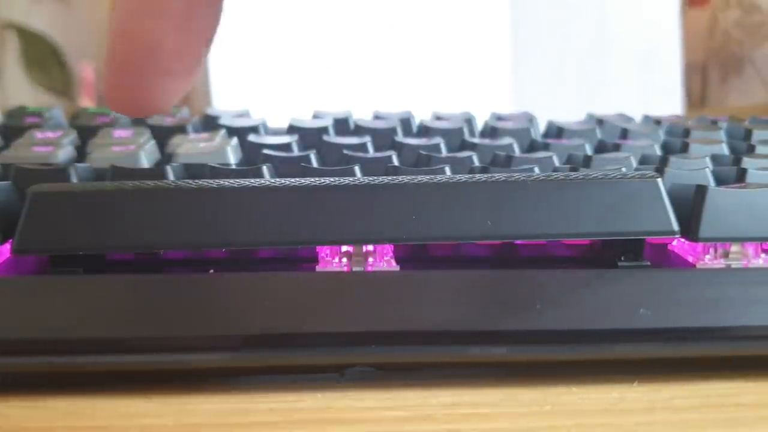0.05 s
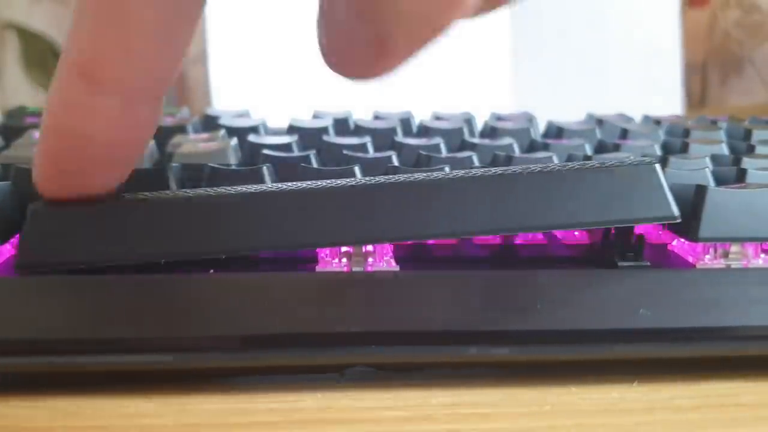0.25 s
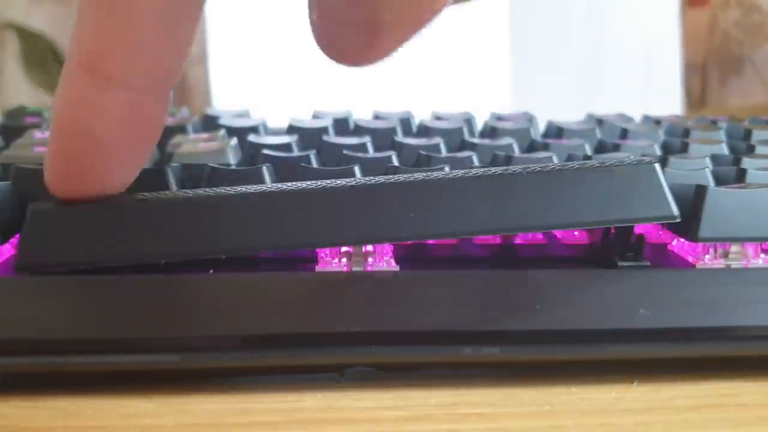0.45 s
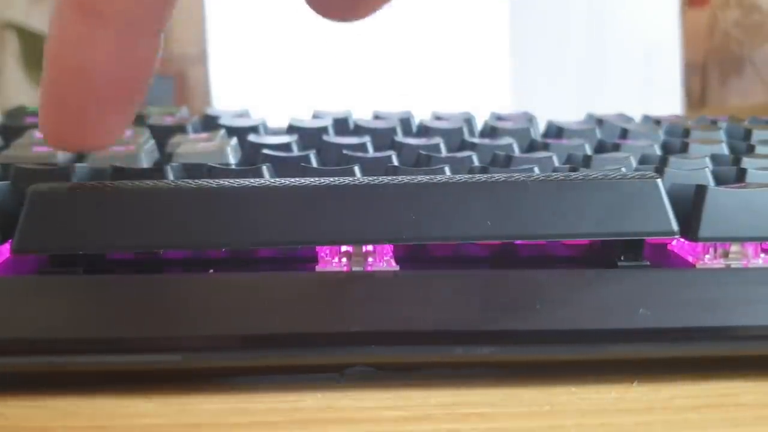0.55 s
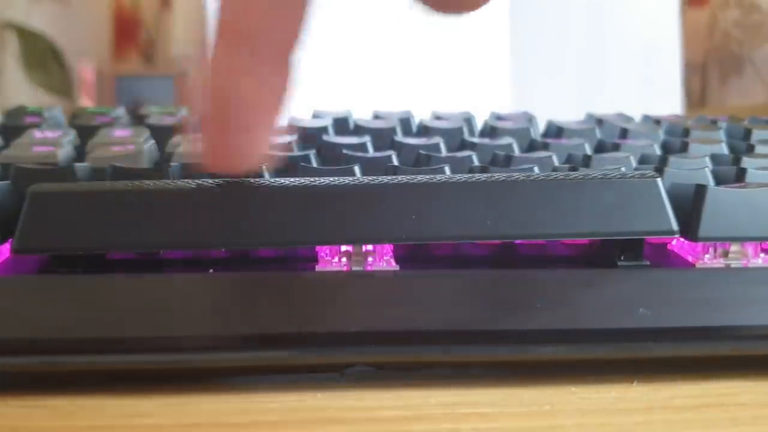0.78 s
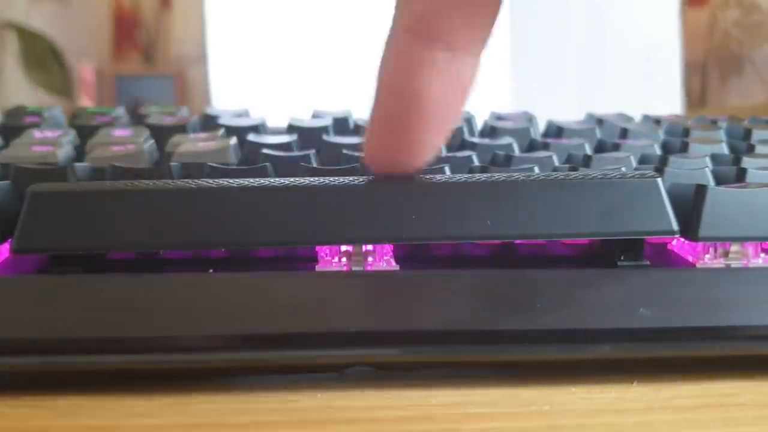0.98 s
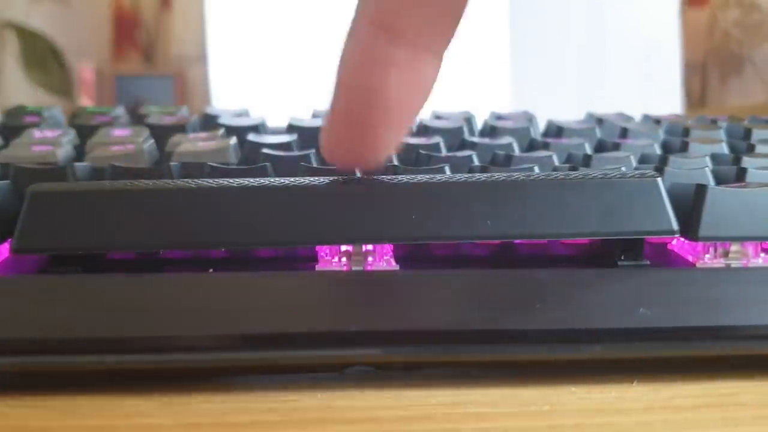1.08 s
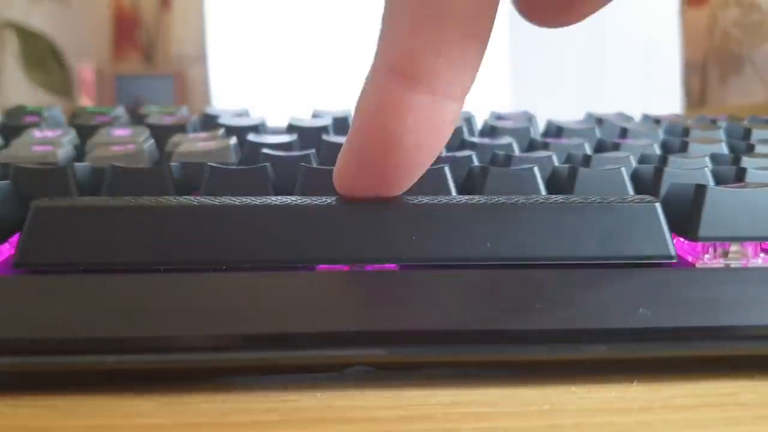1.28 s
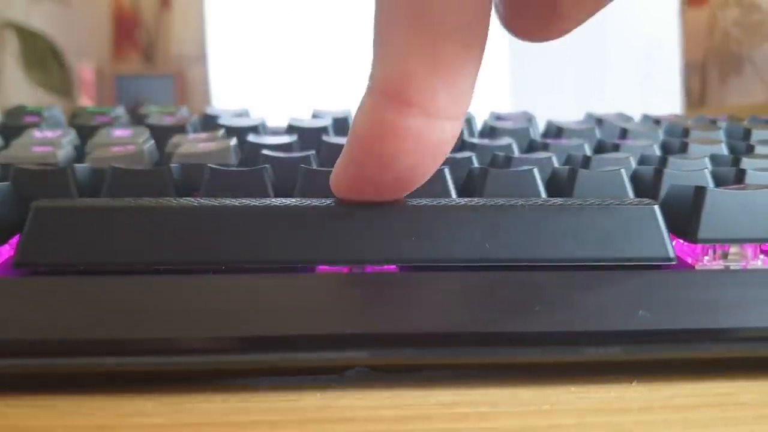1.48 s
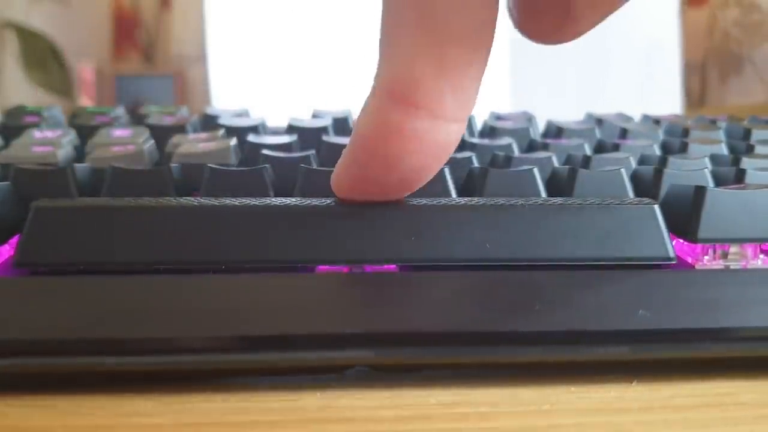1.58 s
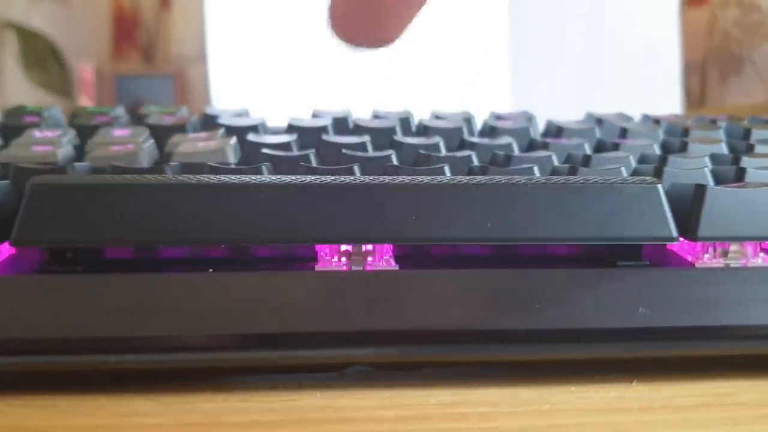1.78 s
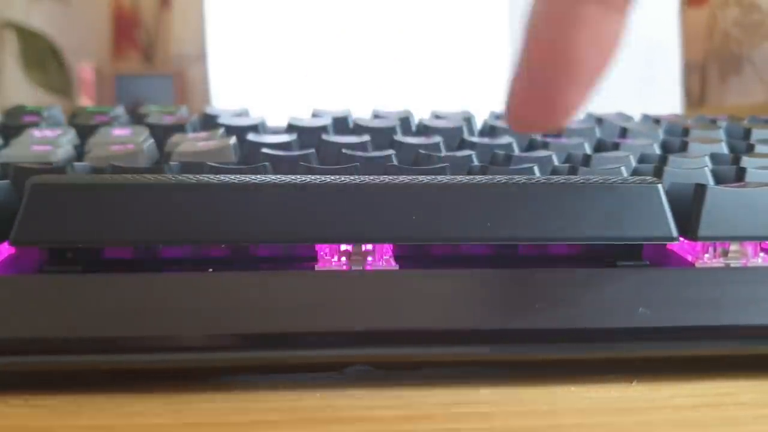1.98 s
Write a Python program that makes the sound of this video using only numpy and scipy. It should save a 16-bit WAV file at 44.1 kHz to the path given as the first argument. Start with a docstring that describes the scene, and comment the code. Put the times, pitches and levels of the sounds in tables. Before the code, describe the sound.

Mechanical keyboard space bar clacking: three quick taps, then one slower press and loud release.

```python
"""A finger works the space bar of a mechanical keyboard on a wooden desk, close up in a small quiet room. Three
quick taps on the bar's end (0.2-0.8 s) rattle it down, sound the hollow case and thump the desk; the switch
spring snaps brightly as the bar goes down and again on each release. Then a slow press in the middle (1.2 s), a
small click while it is held (1.5 s), and a loud clack as the bar springs back (1.7 s)."""
import sys
import numpy as np
from scipy import signal
from scipy.fft import rfft, irfft, next_fast_len
from scipy.io import wavfile

SR = 44100
rng = np.random.default_rng(int(sys.argv[2]) if len(sys.argv) > 2 else 0)


def put_to_file(sound):
    """Save the sound as 16-bit audio at rate SR, in the file named by the first command-line argument."""
    columns = np.atleast_2d(sound).T  # one column per channel
    safe = np.clip(columns, -1, 1)
    whole_steps = np.round(safe * 32767)
    wavfile.write(sys.argv[1], SR, whole_steps.astype(np.int16))


N = 90404
T = np.arange(SR // 3) / SR  # time within one blow [s]

# likeness of left and right: (frequency [Hz], correlation [0-1])
COHERENCE = [(100, 1), (400, 0.49), (1000, 0.2), (3000, 0.07), (10000, 0.01)]


def amp(db):
    """Decibels to gain."""
    return 10 ** (np.asarray(db) / 20)


def along(points, hz):
    """Interpolate (frequency [Hz], value) points on a log axis."""
    points_hz, values = np.transpose(points)
    return np.interp(np.log(hz + 1), np.log(points_hz + 1), values)


def sides(pan_db):
    """Left and right gains for a left-minus-right level."""
    return amp(np.array([[.5], [-.5]]) * pan_db)


def filtered(x, response):
    """Zero-phase filter with gain response(hz)."""
    n = x.shape[-1]
    padded = next_fast_len(n + SR // 10)
    return irfft(rfft(x, padded) * response(np.fft.rfftfreq(padded, 1 / SR)), padded)[..., :n]


def noise(spectrum, coherence, tilt_db_oct=0, size=len(T)):
    """Coloured stereo noise of rms 1, tilted above 1 kHz."""
    def mid_side_gains(hz):
        angle = np.arccos(along(coherence, hz)) / 2
        colour = amp(along(spectrum, hz) + tilt_db_oct * np.log2(np.maximum(hz, 1000)))
        return colour * [np.cos(angle), np.sin(angle)]
    mid, side = filtered(rng.standard_normal((2, size)), mid_side_gains)
    pair = np.array([mid + side, mid - side])
    return pair / pair.std()


def fade(rise_s, t60_s):
    """Quick rise, exponential decay."""
    return (1 - np.exp(-T / rise_s)) * np.exp(-np.log(1000) * T / t60_s)


def burst(spectrum, rise_s, t60_s, tilt_db_oct=0):
    """Dying noise burst, scaled to the energy of its envelope."""
    envelope = fade(rise_s, t60_s)
    sound = noise(spectrum, COHERENCE, tilt_db_oct) * envelope
    return sound * np.linalg.norm(envelope) / np.linalg.norm(sound, axis=1, keepdims=True)


def ring(modes, rise_s, detune=.014):
    """Damped modes, slightly different at each blow and each microphone port."""
    sound = np.zeros((2, len(T)))
    for hz, db, t60_s in modes:
        jitter_db, mistune, apart, start = rng.standard_normal(4)
        spread_rad = np.arccos(along(COHERENCE, hz)) * apart * np.array([[.5], [-.5]])
        phase = 2 * np.pi * hz * (1 + detune * mistune) * T + np.pi * start + spread_rad
        sound += amp(db + jitter_db) * fade(rise_s, t60_s) * np.sin(phase)
    return sound


def stroke_at(time_s):
    """Nearest stroke: the finger's place sets the bar's favoured band and the spill into the room."""
    # (time [s], band centre [Hz], band boost [dB], spill [dB])
    strokes = [(.23, 2050, 2.5, 3.5), (.34, 2630, 1.5, 2.5), (.45, 1435, 4.5, 0.5), (.56, 2386, 2.5, 1.5),
               (.66, 3650, 0.5, 0), (.78, 1095, 1, 3), (1.21, 1540, 0.5, 2), (1.48, 2300, -4.5, 5),
               (1.74, 1150, 3, 1)]
    return min(strokes, key=lambda stroke: abs(stroke[0] - time_s))


def room_air():
    """Faint, steady low noise of the room."""
    # (frequency [Hz], density [dB])
    spectrum = [(25, -23), (60, -19.5), (95, -7), (130, 2.5), (190, 6), (300, 0), (450, -3), (720, -15),
                (1100, -29.5), (2500, -35), (8500, -45), (11500, -37), (16000, -36.5)]
    # (frequency [Hz], left-right correlation [0-1])
    coherence = [(100, .95), (400, .8), (1000, 0.77), (4000, 0.09)]
    return amp(-55) * sides(pan_db=-1.5) * noise(spectrum, coherence, size=N)


def room_tail(sound, delay_s=.009, build_s=.003):
    """Short diffuse reflections, drawn afresh for each sound."""
    # (frequency [Hz], t60 [s])
    decay = [(200, 0.0032), (1000, 0.19), (3000, 0.1233), (8000, 0.16), (15000, 0.13)]
    # (frequency [Hz], gain [dB])
    colour = [(100, 8.5), (400, 5.5), (1200, -13), (3000, -3), (7000, -8), (12000, -6), (16000, -10.5)]
    white = noise([(100, 0)], COHERENCE)
    band_hz, frame_s, bands = signal.stft(white, SR, nperseg=256)
    bands = bands * np.exp(-np.log(1000) * frame_s / along(decay, band_hz)[:, None])
    tail = signal.istft(bands, SR)[1][:, :len(T)]
    tail = filtered(tail, lambda hz: amp(along(colour, hz))) / np.sqrt(np.sum(tail ** 2) / 2)
    tail *= 1 - np.exp(-np.maximum(T - delay_s, 0) / build_s)
    return signal.fftconvolve(sound[:1], tail, axes=1)[:, :len(T)]


def place(track, sound, time_s, db, pan_db, room_db):
    """Add a sound and its room tail to the track."""
    # direct sound at the microphone ports: (frequency [Hz], left-right [dB])
    port_balance = [(200, -4.5), (500, -5.5), (1300, -1.5), (2400, 2), (4400, -4), (8000, -4), (11000, 5),
                    (14000, 5)]
    *_, spill_db = stroke_at(time_s)
    direct = filtered(sound, lambda hz: sides(pan_db + along(port_balance, hz)))
    reflected = amp(room_db + spill_db) * room_tail(sound)
    track[:, round(time_s * SR):][:, :len(T)] += amp(db) * (direct + reflected)


def desk():
    """The desk top swings briefly under each stroke and knocks in its upper modes."""
    # (time [s], thump level [dB], thump pitch [Hz], knock level [dB])
    pushes = [(.25, -32.5, 54, -43.5), (0.337, -47.5, 56, -48.5), (0.455, -44.5, 57, -44.5),
              (.545, -49, 61.4, -48), (0.673, -35, 56, -44), (0.787, -47, 60, -47),
              (1.185, -41.5, 66.8, -57.5), (1.227, -43.5, 68, -50.5), (1.485, -73, 61.7, -43),
              (1.737, -39.5, 66, -38)]
    # (frequency [Hz], level [dB], t60 [s])
    modes = [(132.6, -12.5, 0.74), (182.3, -5.5, 0.42), (211.7, -1.5, 0.23), (271.4, 0.5, .15)]
    track = np.zeros((2, N + SR))
    for time_s, thump_db, hz, knock_db in pushes:
        thump = amp(thump_db) * fade(rise_s=.0071, t60_s=.19) * np.sin(2 * np.pi * hz * T)
        knock = amp(knock_db) * ring(modes, rise_s=.0013)
        track[:, round(time_s * SR):][:, :len(T)] += thump + knock
    return sides(pan_db=-5) * track[:, :N]


def hollow_case(rise_s=.006):
    """The hollow case answers each stroke with a short low note, in mono."""
    # (frequency [Hz], level [dB], t60 [s])
    modes = [(377.5, 2.5, 0.079), (407, -7, 0.12), (502, -11, 0.1)]
    # (time [s], level [dB])
    thocks = [(.23, -33.5), (.344, -29), (.446, -34), (.56, -29.5), (.659, -35), (.786, -34), (1.224, -40),
              (1.484, -39), (1.741, -23.5)]
    track = np.zeros(N + SR)
    note = sum(amp(db) * fade(rise_s, t60_s) * np.sin(2 * np.pi * hz * T) for hz, db, t60_s in modes)
    for time_s, db in thocks:
        track[round(time_s * SR):][:len(T)] += amp(db) * note
    return track[:N]


def switch(rise_s=.00046):
    """The switch spring lets go with a very short, bright snap and ring."""
    # (time [s], level [dB], left-right [dB])
    snaps = [(0.2279, -28.5, 4), (.2406, -34.5, 10), (0.336, -19, -4), (.338, -22.5, 5.5),
             (0.3395, -9.5, 6.5), (0.4429, -25, -4), (0.5494, -39, 12), (0.5548, -13, 5.5), (.5557, -18, 5),
             (0.6544, -27, 16), (0.771, -34.5, 0.5), (0.7777, -17, 11), (.7792, -18, 9), (1.4842, -30, 7)]
    # (frequency [Hz], density [dB])
    spectrum = [(1000, -22), (4000, -16), (5800, -22), (7000, -5.5), (9500, -12.5), (11200, 5),
                (12900, -3.5), (14300, -13), (16000, -7)]
    # (frequency [Hz], level [dB], t60 [s])
    spring_modes = [(5900, -1.5, .014), (10260, -4.5, .011), (12740, -1.5, 0.028), (11760, -2, .011)]
    track = np.zeros((2, N + SR))
    for time_s, db, pan_db in snaps:
        snap = burst(spectrum, rise_s, t60_s=.014) + amp(-10) * ring(spring_modes, rise_s)
        place(track, snap, time_s, db, pan_db, room_db=-5)
    return track[:, :N]


def clack(time_s, tilt_db_oct, rise_s=.00036, band_sigma_oct=.29):
    """Plastic meets plastic: a crack, a dense clatter and the ring of bar and plate."""
    # both: (frequency [Hz], density [dB])
    crack_spectrum = [(40, -42.5), (150, -15.5), (400, -10.5), (800, -13.5), (1050, 0.5), (2400, -1),
                      (4200, -4.5), (6500, 3), (9000, -7), (12000, -4), (16000, -8.5)]
    clatter_spectrum = [(40, -40.5), (150, -9.5), (400, -8.5), (800, -9), (1050, -7.5), (2400, -4.5),
                        (4200, -5), (6500, -4.5), (9000, -7.5), (16000, -12.5)]
    # (frequency [Hz], level [dB], t60 [s])
    bar_modes = [(992, -1.5, 0.032), (1086.6, -1.5, 0.051), (1221, -3.5, 0.059), (1527, -5, .04),
                 (1678, -3, .045), (1949, -1, 0.044), (2290, -5.5, 0.039), (2462, 1.5, .04),
                 (2795, -5, .035), (3010, -5.5, .035), (3434, -0.5, 0.047), (3700, -6, .04),
                 (4530, -9, 0.074), (7090, -9, .03)]
    _, centre_hz, boost_db, _ = stroke_at(time_s)

    def favoured_band(hz):
        offset_oct = np.log2((hz + 1) / centre_hz)
        return amp(boost_db * np.exp(-.5 * (offset_oct / band_sigma_oct) ** 2))
    crack = burst(crack_spectrum, rise_s, t60_s=.014, tilt_db_oct=tilt_db_oct)
    clatter = amp(-3.5) * burst(clatter_spectrum, rise_s, t60_s=.051, tilt_db_oct=tilt_db_oct)
    ringing = amp(-10.5) * ring(bar_modes, rise_s=.0015)
    return filtered(crack + clatter + ringing, favoured_band)


def space_bar(room_db=-.5):
    """The bar clacks going down and springing up against its stops, and ticks in between."""
    # contacts, down and up: (time [s], level [dB], tilt [dB/octave], left-right [dB])
    presses = [(.2287, -34.5, -7.5, 6.5), (.2302, -30, 0, 5.5), (.2348, -32.5, 0.5, -5.5),
               (.2412, -27.5, 1.5, 1), (.4435, -30.5, -1.5, 4.5), (.4452, -26, 2, 4.5),
               (.4505, -31.5, -5, -4), (.4572, -24.5, 0.3, 3), (.6565, -22, 2.5, 2.5),
               (.6625, -34.5, -3.5, -10.5), (.6668, -22.5, 0, 1.5), (1.1995, -41, -9.5, -2),
               (1.2025, -44.5, -2, 2), (1.209, -40, -3.5, 4.5), (1.2175, -38.5, -8, 5),
               (1.226, -37.5, -9, 1), (1.2293, -38, -2, 0.5), (1.483, -36, -1.5, -2.5),
               (1.486, -35.5, -2.8, 7.5)]
    returns = [(.3325, -34, -2.5, 4.5), (.338, -25.5, 2, 2.5), (.344, -31.5, 1, -8), (.3545, -35, 1, 4),
               (.551, -31.5, -4, 7), (.555, -27.5, 3, 4), (.5625, -24, 3.5, 1), (.7715, -29, 0.5, -1),
               (.7765, -29.5, -1.5, 2), (.788, -31.5, -2, 3), (1.728, -45, -4, 2), (1.7315, -36.5, -7.5, 8),
               (1.7375, -29.5, 0, 10), (1.7402, -17.5, 3, 0), (1.7428, -21, -4, 9), (1.749, -31, -5, -2.5)]
    # loose bar shifting under the finger: (time [s], level [dB])
    ticks = [(0.303, -48.5), (.311, -53.5), (0.318, -47), (0.519, -54), (0.5358, -46.5), (0.545, -45),
             (0.728, -49), (.753, -51.5), (.7635, -45.5), (1.1839, -52.5), (1.188, -51.5), (1.690, -56),
             (1.709, -52.5), (1.719, -52.5)]
    track = np.zeros((2, N + SR))
    for time_s, db, tilt_db_oct, pan_db in [*presses, *returns]:
        place(track, clack(time_s, tilt_db_oct), time_s, db, pan_db, room_db)
    for time_s, db in ticks:
        place(track, clack(time_s, tilt_db_oct=-5.3), time_s, db, pan_db=0, room_db=room_db)
    return track[:, :N]


def scene():
    """Keyboard and desk over the low noise of the room."""
    return room_air() + space_bar() + switch() + hollow_case() + desk()


def record(dry):
    """Steep low-pass at the top of the treble."""
    cutoff_hz, order = 15900, 90
    return filtered(dry, lambda hz: 1 / np.sqrt(1 + (hz / cutoff_hz) ** (2 * order)))


dry = scene()
out = record(dry)
put_to_file(out)
```